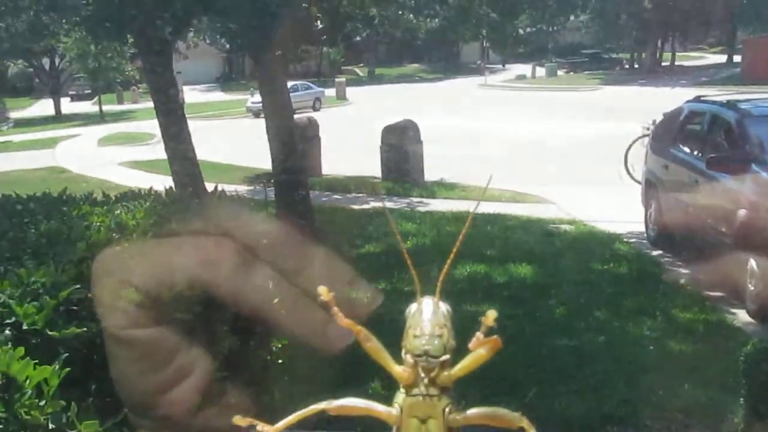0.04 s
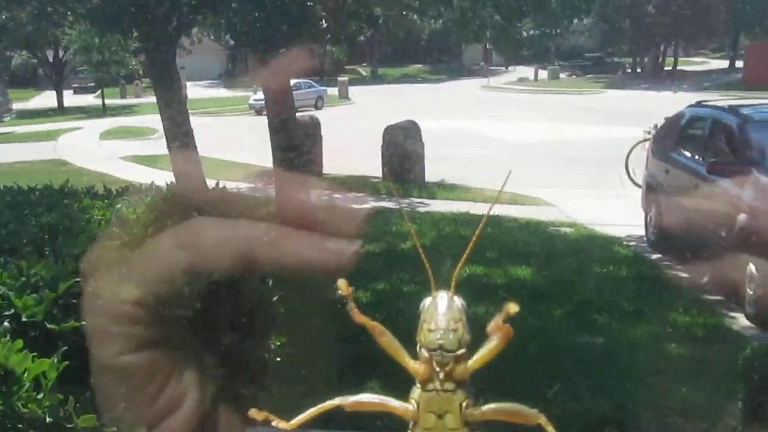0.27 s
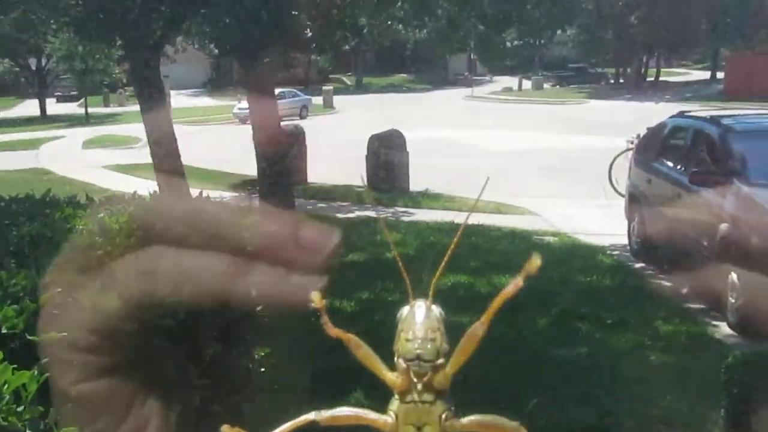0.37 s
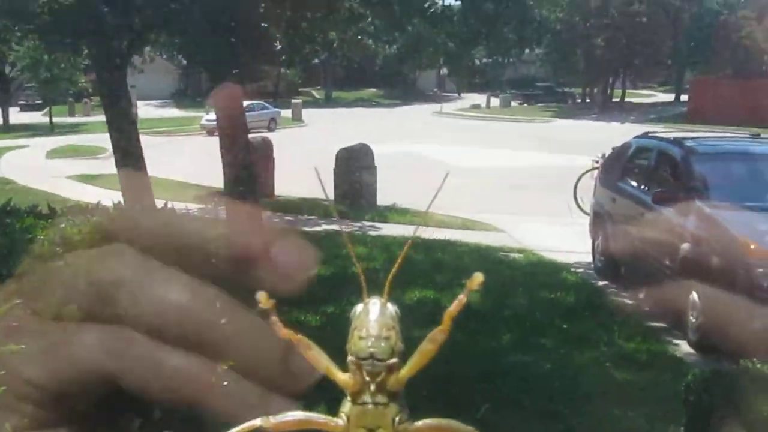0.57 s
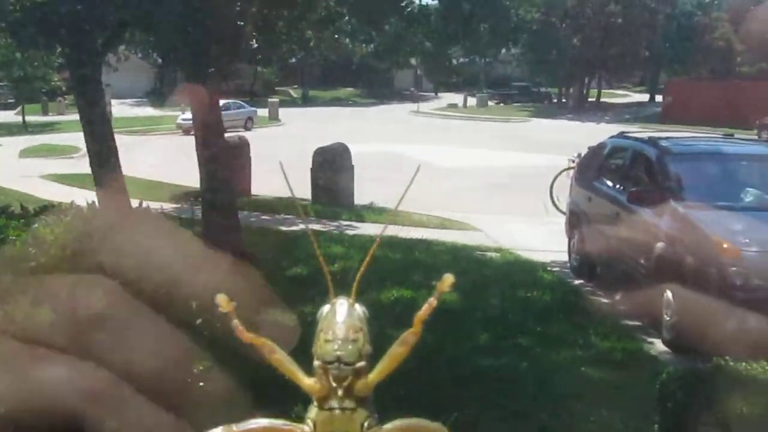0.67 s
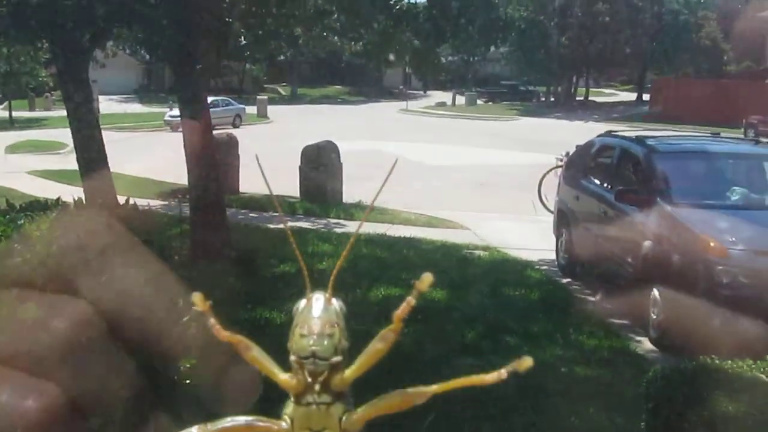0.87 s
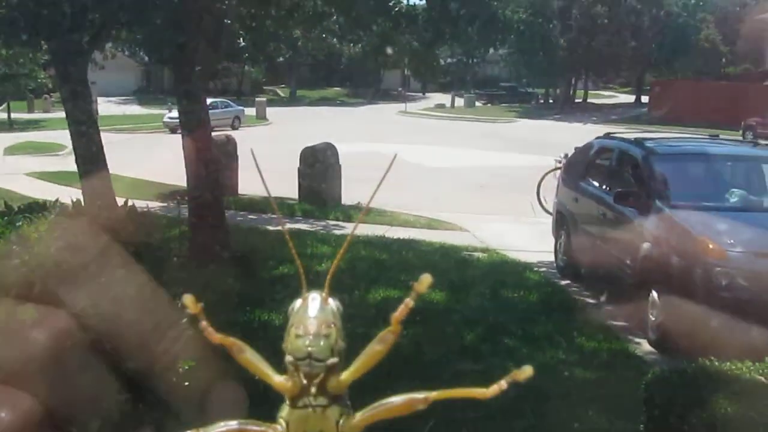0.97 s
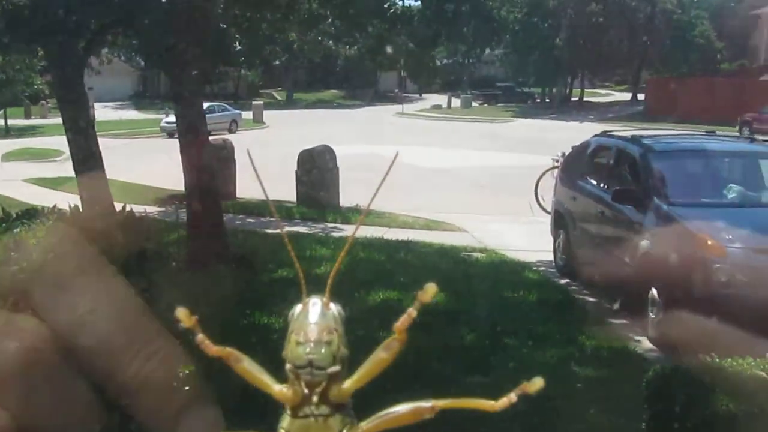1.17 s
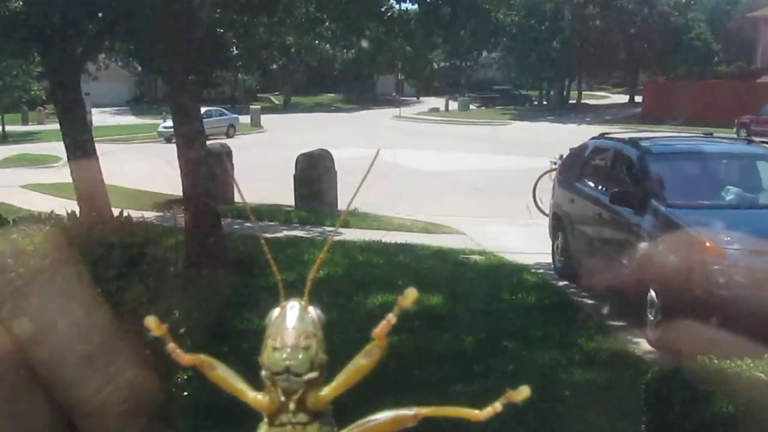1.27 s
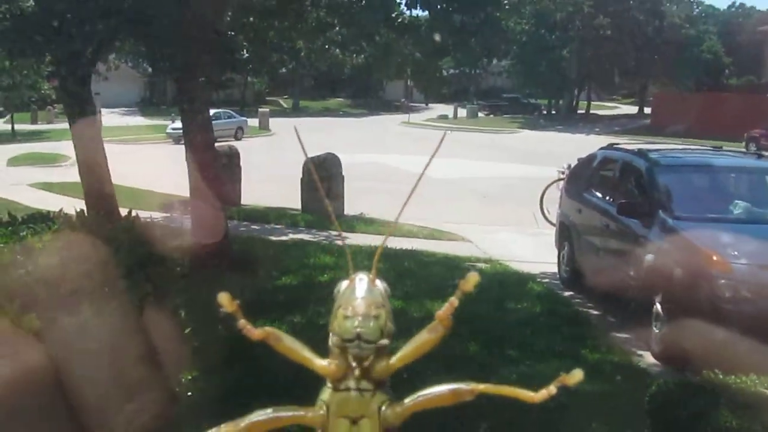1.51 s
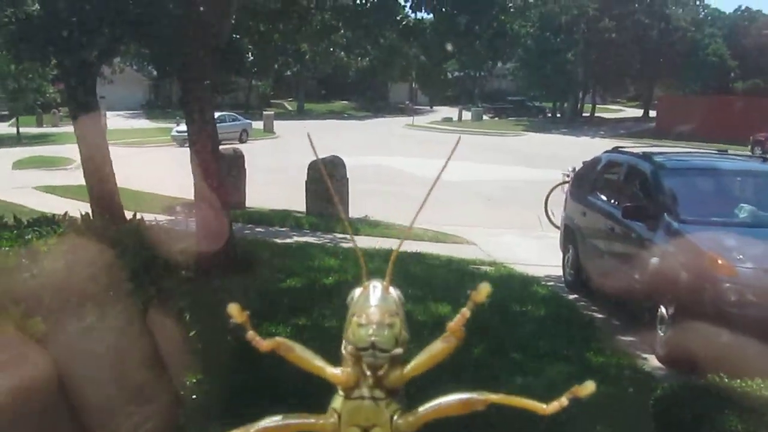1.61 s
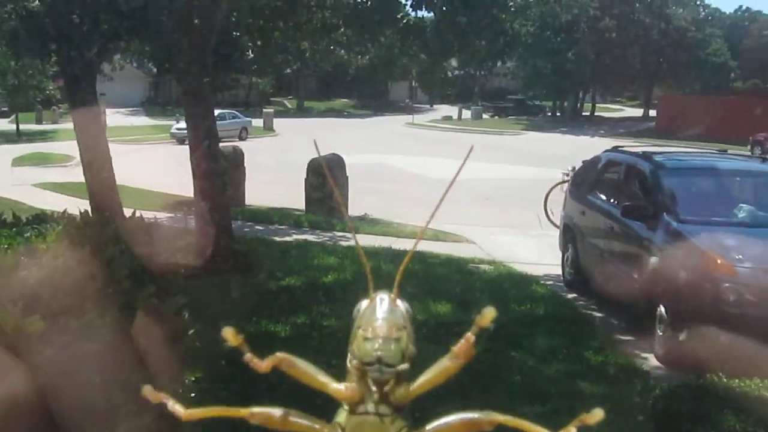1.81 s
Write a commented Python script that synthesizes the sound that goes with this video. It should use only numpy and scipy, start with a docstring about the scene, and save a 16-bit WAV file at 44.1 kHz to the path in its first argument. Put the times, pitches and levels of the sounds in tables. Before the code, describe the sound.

A fingertip rubs dryly on window glass, very close and to the left. A stroke starts at 0.2 seconds and catches with sharp snaps, loudest around 0.4. Short, slightly squeaky scuffs stutter from 0.7 to 1.1 seconds. A soft wipe follows from 1.2 to 1.4, then two faint taps near 1.8. The quiet room holds a faint low hum and a thin electrical whine throughout.

```python
"""At a window pane, very close and to the left: dry rubbing, probably a fingertip. One long stroke
catches and snaps, then come short stick-slip scuffs, a soft wipe and two faint taps. Friction grains
ring a well damped body. Behind it, a quiet room with mains hum and a thin electrical whine."""
import sys
import numpy as np
from scipy import signal
from scipy.fft import rfft, irfft, next_fast_len
from scipy.io import wavfile
from scipy.ndimage import map_coordinates

SR = 44100
rng = np.random.default_rng(int(sys.argv[2]) if len(sys.argv) > 2 else 0)


def waveform_to_disk(signal):
    """Save audio, clipped to [-1, 1], as 16-bit WAV at the path in sys.argv[1]."""
    frames = np.transpose(np.atleast_2d(signal))
    scaled = np.clip(frames, -1, 1) * 32767
    samples = np.round(scaled).astype(np.int16)
    wavfile.write(sys.argv[1], SR, samples)


N = 81585
TIME_S = np.arange(N) / SR

# friction spectrum of scuffs and drag (frequency [Hz], level [dB])
SCUFF_SPECTRUM = [(100, -20), (330, -21.5), (500, -16.5), (700, -15.5), (1150, -8.5), (1500, -1.5),
                  (2400, 1.5), (3200, -9), (4300, -10), (5400, -5), (6400, -13.5), (7300, -16.5),
                  (9500, -18.5), (11500, -12), (14000, -20), (16000, -36)]


def amp(db):
    """Decibels to gain."""
    return 10 ** (np.asarray(db) / 20)


def unit(x):
    """Scale to rms 1."""
    return x / np.sqrt(np.mean(x ** 2) + 1e-20)


def along(points, hz):
    """Interpolate (frequency [Hz], value) on a log axis."""
    f, v = np.transpose(points)
    return np.interp(np.log(hz + 1), np.log(f + 1), v)


def curve(points, outside=None):
    """Interpolate (time [s], value) per sample."""
    times_s, values = np.transpose(points)
    return np.interp(TIME_S, times_s, values, outside, outside)


def wobble(knots_per_s):
    """Smooth random curve."""
    return map_coordinates(rng.standard_normal(N // 20), [TIME_S * knots_per_s], mode="wrap")


def filtered(x, response):
    """Apply a frequency response."""
    m = next_fast_len(N + SR // 4)
    return irfft(rfft(x, m) * response(np.fft.rfftfreq(m, 1 / SR)), m)[..., :N]


def resonance(f, hz, width_hz):
    """Response of one damped mode."""
    return 1j * f * width_hz / (hz * hz - f * f + 1j * f * width_hz)


def damped_sine(t, hz, t60_s):
    """Free decay of one mode."""
    return np.sin(2 * np.pi * hz * t) * np.exp(-np.log(1000) * t / t60_s)


def tone(hz):
    """Sine at rms 1, random phase."""
    return np.sqrt(2) * np.sin(2 * np.pi * (hz * TIME_S + rng.random()))


def noise_on_left(pair, lag_s=.00011):
    """Left at rms 1; right later, shaded and partly unrelated."""
    # left-right likeness (frequency [Hz], coherence [0-1])
    likeness = [(150, 0.82), (600, 0.12), (1400, 1), (3000, 0.13), (12000, 0.49)]
    # right side against left (frequency [Hz], gain [dB])
    shading = [(120, 7.5), (300, 3), (490, -23), (680, 1), (950, -7), (1400, -8.5), (2000, -33),
               (2600, -11.5), (3800, -5.5), (5200, -12.5), (6300, -11), (8300, -1.5), (10500, -13),
               (14000, -12)]
    coherence = lambda f: np.clip(along(likeness, f), 0, 1)
    delayed = filtered(pair[0], lambda f: coherence(f) * np.exp(-2j * np.pi * f * lag_s))
    unrelated = filtered(pair[1], lambda f: np.sqrt(1 - coherence(f) ** 2))
    right = filtered(delayed + unrelated, lambda f: amp(along(shading, f)))
    return np.array([pair[0], right]) / np.std(pair[0])


def point_on_left(x, lag_s=.00007, right_db=-10):
    """A point on the pane: right later and weaker."""
    return np.array([x, amp(right_db) * filtered(x, lambda f: np.exp(-2j * np.pi * f * lag_s))])


def air(level_db=-56):
    """Steady, diffuse room noise."""
    # room noise (frequency [Hz], level [dB])
    spectrum = [(20, -6), (40, -10), (80, -3), (130, -4), (220, -2), (340, -5), (650, -4.5), (1000, -3),
                (1400, -6.5), (1800, -10), (4000, -15.5), (9000, -25), (13000, -31), (15500, -34)]
    # left-right likeness (frequency [Hz], coherence [0-1])
    likeness = [(60, 0.38), (300, 0.32), (1000, 0.28), (3000, 0.11), (12000, 0.053)]
    angle = lambda f: np.arccos(np.clip(along(likeness, f), -1, 1)) / 2
    response = lambda f: amp(along(spectrum, f)) * [np.cos(angle(f)), np.sin(angle(f))]
    mid, side = filtered(rng.standard_normal((2, N)), response)
    return amp(level_db) * unit(np.array([mid + side, mid - side]))


def hum():
    """Mains hum: three steady low tones."""
    # hum partials (frequency [Hz], left [dB], right [dB])
    partials = [(59, -67, -66), (119.8, -68, -68.5), (183.4, -73.5, -71)]
    return sum(amp([[left_db], [right_db]]) * tone(hz) for hz, left_db, right_db in partials)


def whine(hz=15736, right_db=-63.5, left_offset_db=-8.5):
    """Thin electrical tone that swells and flutters."""
    swell = amp(right_db + 2 * wobble(16))
    carrier = tone(hz)
    flutter = .4 * wobble(110) * tone(hz)
    return swell * (carrier + flutter) * amp([[left_offset_db], [0]])


def grains(slips_per_s=9000, scatter_db=3, hiss_db=-5.5):
    """Two unrelated streams of tiny slips on smooth hiss."""
    slips = (rng.random((2, N)) < slips_per_s / SR) * rng.choice([-1, 1], (2, N))
    sizes = amp(scatter_db * rng.standard_normal((2, N)))
    return unit(slips * sizes) + amp(hiss_db) * rng.standard_normal((2, N))


def friction(spectrum, bass_hz=990, treble_hz=4140):
    """Steady sliding through the body's resonances; returns bass, middle, treble."""
    # resonances and notches of the rubbed body (frequency [Hz], width [Hz], gain [dB])
    modes = [(309, 16, 9.5), (506.6, 103, 18), (867.6, 144, 11), (1050, 130, -0.5), (1250, 120, 2.5),
             (1835, 180, 4), (2750, 270, 3.5), (3670, 500, 4.5), (5950, 115, -24), (6095, 520, 8),
             (7860, 100, -11), (8550, 1900, 2.5)]
    body_db = lambda f: sum(db / (1 + (2 * (f - hz) / width_hz) ** 2) for hz, width_hz, db in modes)
    sliding = noise_on_left(filtered(grains(), lambda f: amp(along(spectrum, f) + body_db(f))))
    bass = filtered(sliding, lambda f: 1 / (1 + (f / bass_hz) ** 4))
    treble = filtered(sliding, lambda f: 1 - 1 / (1 + (f / treble_hz) ** 4))
    return bass, sliding - bass - treble, treble


def rub(envelope, spectrum, treble_db=0, bass_db=0, flutter_db=1.4):
    """Sustained slide with a fluttering grip."""
    bass, middle, treble = friction(spectrum)
    grip = amp(curve(envelope, -np.inf) + flutter_db * wobble(260))
    return grip * (amp(bass_db) * bass + middle + amp(treble_db) * treble)


def stroke():
    """Long first slide: brighter with speed, heavier with pressure."""
    # loudness (time [s], level [dB])
    envelope = [(.175, -67), (.1965, -47), (.201, -37.5), (.22, -39), (.245, -41), (.3, -39), (.362, -38),
                (.385, -32), (.41, -24.5), (.445, -31), (.468, -27.5), (.488, -30.5), (.503, -30.5),
                (.513, -44), (.526, -65), (.565, -47), (.59, -68)]
    # friction spectrum (frequency [Hz], level [dB])
    spectrum = [(100, -33), (330, -16), (500, -12.5), (700, -13), (1100, -7), (1550, 2), (2200, 1),
                (2750, -1), (3200, -6.5), (4600, -7.5), (5600, -1), (6600, -13), (8000, -17),
                (10500, -16.5), (14000, -22), (16000, -35)]
    # sliding speed, as tone (time [s], treble [dB])
    brightness = [(.21, 4.5), (.26, 1.5), (.35, 0.5), (.4, -6.5), (.44, 1.5), (.485, 2.5), (.51, -9.5),
                  (.565, -2.5)]
    # pressure, as tone (time [s], bass [dB])
    weight = [(.205, -1), (.25, -7), (.35, -2), (.405, -10), (.432, -2.5), (.455, -1.5), (.468, 6.5),
              (.483, -18.5), (.505, 7)]
    return rub(envelope, spectrum, curve(brightness), curve(weight))


def snaps(attack_s=.00012, highpass_hz=1100, lowpass_hz=7000):
    """The stuck contact lets go: a sharp click and a few cycles of ring."""
    # releases (time [s], level [dB], ring [Hz], relative click [dB])
    releases = [(.199, -21, 1300, -3), (.3667, -12, 1700, -6), (.3722, -14, 1400, -8),
                (.3964, -7.5, 1560, -22), (.4003, -3, 1550, -5), (.408, -14, 1650, -8),
                (.4198, -5, 1480, -6), (.4242, -12, 1400, -14), (.4643, -15, 950, -8),
                (.7352, -25, 1800, 2), (.8848, -26, 2000, 2), (1.0555, -27, 1500, 2)]
    out = np.zeros(N)
    for start_s, db, hz, click_db in releases:
        t = np.maximum(TIME_S - start_s, 0)
        ring = damped_sine(t, hz, t60_s=.0058) * (1 - np.exp(-t / attack_s))
        click = damped_sine(t, hz=3100, t60_s=.0015)
        out += amp(db) * (ring + amp(click_db) * click)
    band = lambda f: (1 - 1 / (1 + (f / highpass_hz) ** 6)) / (1 + 1j * f / lowpass_hz)
    return point_on_left(filtered(out, band))


def scuffs(attack_s=.0006, release_s=.003, swell_db=5, thump_hz=146):
    """Stick-slip: each slip starts abruptly, swells, squeaks and faintly thumps the pane."""
    # slips (time [s], length [s], level [dB], squeak [Hz], relative squeak [dB], treble [dB])
    slips = [(0.2013, .008, -42.5, 775, -1.5, 9), (0.3674, 0.0061, -26.5, 1710, -5, -4.5),
             (0.3705, 0.0072, -24, 1280, 0.5, -2), (0.541, 0.0066, -46, 1590, -10, -5),
             (0.7053, 0.017, -37.5, 2175, -5.5, 0), (0.735, 0.017, -33, 1810, -10, 4.5),
             (.815, 0.012, -38, 2080, -6, -3), (.849, .014, -34, 2106, -8, 3.5),
             (0.8838, 0.016, -35, 1794, -3.5, 6), (0.9129, .016, -32.5, 1888, -3.5, 4.5),
             (.944, 0.016, -33, 1878, -8.5, 4.5), (1.055, .015, -34.5, 1420, -8.5, 4),
             (1.082, 0.019, -38.5, 1360, -4, -2)]
    bass, middle, treble = friction(SCUFF_SPECTRUM)
    out, squeaks = np.zeros((2, N)), np.zeros(N)
    wander_rad = .8 * wobble(350)
    for start_s, length_s, db, hz, squeak_db, treble_db in slips:
        t = np.maximum(TIME_S - start_s, 0)
        attack = 1 - np.exp(-t / attack_s)
        swell = amp(swell_db * (np.sin(np.pi * np.minimum(t / length_s, 1)) - 1))
        release = np.exp(-np.maximum(t - .68 * length_s, 0) / release_s)
        out += amp(db) * attack * swell * release * (bass + middle + amp(treble_db) * treble)
        build = attack * np.exp(-((t / length_s - .62) / .4) ** 2)  # squeak peaks late in the slip
        squeaks += amp(db + squeak_db) * build * np.sqrt(2) * np.sin(2 * np.pi * hz * t + wander_rad)
        push = min(length_s * thump_hz / 2, 1) ** 2  # very short slips hardly move the pane
        thump = push * damped_sine(t, thump_hz, t60_s=.023)
        out += amp([[db - 14], [db - 5]]) * thump
    return out + point_on_left(squeaks)


def chatter(hz=1470, stage_width_hz=880):
    """The grip tightens mid-stroke: dense slips ring the contact's own resonance."""
    # loudness (time [s], level [dB])
    envelope = [(.28, -55), (.345, -42), (.382, -39), (.391, -34), (.402, -38), (.418, -34), (.432, -43),
                (.46, -52)]
    ring = filtered(grains(), lambda f: resonance(f, hz, stage_width_hz) ** 4)
    return amp(curve(envelope, -np.inf)) * noise_on_left(ring)


def drag():
    """Light sliding between scuffs."""
    # loudness (time [s], level [dB])
    envelope = [(.735, -63), (.745, -42), (.762, -35.5), (.785, -40.5), (.812, -46), (.835, -56)]
    return rub(envelope, SCUFF_SPECTRUM, bass_db=2.5)


def wipe():
    """Soft last slide that brightens."""
    # loudness (time [s], level [dB])
    envelope = [(1.197, -63), (1.212, -46.5), (1.231, -32.5), (1.255, -46.5), (1.28, -51), (1.335, -47),
                (1.385, -50), (1.415, -65)]
    # friction spectrum (frequency [Hz], level [dB])
    spectrum = [(100, -25), (330, -12.5), (500, -7.5), (720, -7), (950, -3.5), (1600, -4.5), (1850, 4.5),
                (2200, 6.5), (2400, -4.5), (4000, -14.5), (5400, -14.5), (7000, -22), (8500, -19),
                (9700, -30), (11500, -19), (15500, -32)]
    # high band gain (time [s], treble [dB])
    brightness = [(1.24, 3.5), (1.32, 11.5)]
    # low band gain (time [s], bass [dB])
    weight = [(1.23, 1), (1.28, 4), (1.34, 3), (1.38, -3)]
    return rub(envelope, spectrum, curve(brightness), curve(weight))


def taps(knock_rise_s=.005, tick_rise_s=.0012):
    """Faint touches on the glass: a crisp tick, then a soft knock."""
    # touches (time [s], knock [dB], tick [dB])
    touches = [(1.749, -51, -55), (1.786, -56, -75)]
    band = lambda hz, width_hz: unit(filtered(grains(), lambda f: resonance(f, hz, width_hz) ** 2))
    bump = lambda u: u * np.exp(1 - u)
    knock = band(hz=1050, width_hz=500)[0]
    tick = band(hz=8000, width_hz=1600)
    out = np.zeros((2, N))
    for start_s, knock_db, tick_db in touches:
        t = np.maximum(TIME_S - start_s, 0)
        out += amp(knock_db) * bump(t / knock_rise_s) * knock
        out += amp(tick_db) * bump(t / tick_rise_s) * tick
    return out


def room(x, gain_db=-15.5, t60_s=.052, lowpass_hz=3500):
    """Faint, short reverberation of the left channel, on both sides."""
    t = np.arange(SR // 3) / SR
    tail = rng.standard_normal((2, len(t))) * np.exp(-np.log(1000) * t / t60_s)
    wet = signal.fftconvolve(x[:1], tail / np.linalg.norm(tail[0]), axes=1)[:, :N]
    return amp(gain_db) * filtered(wet, lambda f: 1 / (1 + 1j * f / lowpass_hz))


def scene():
    """Contact sounds on the pane in the quiet room."""
    contact = stroke() + chatter() + snaps() + scuffs() + drag() + wipe() + taps()
    return contact + room(contact) + air() + hum() + whine()


def record(dry):
    """Brick-wall low-pass."""
    top_hz = 16300
    return filtered(dry, lambda f: f < top_hz)


dry = scene()
out = record(dry)
waveform_to_disk(out)
```